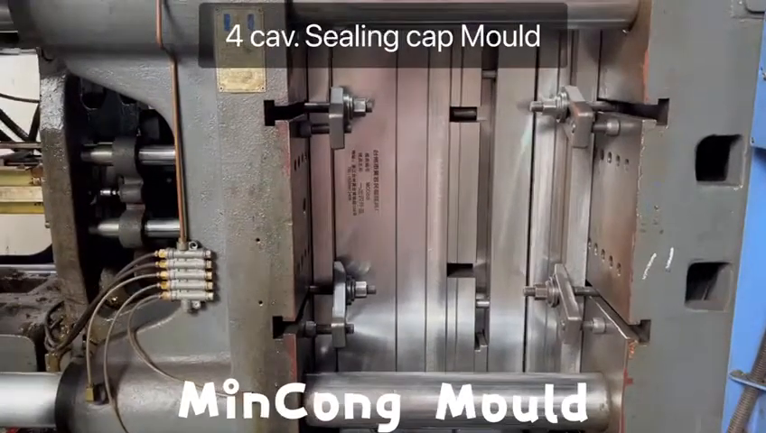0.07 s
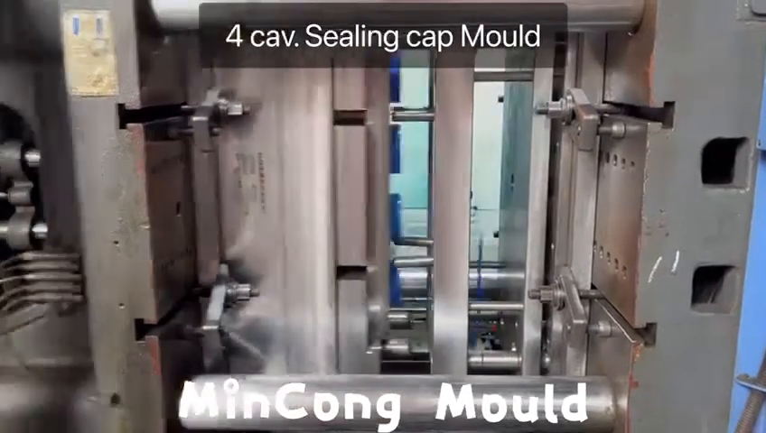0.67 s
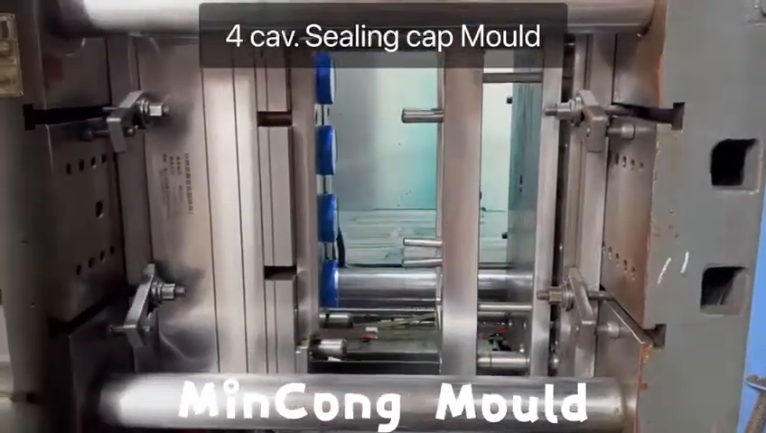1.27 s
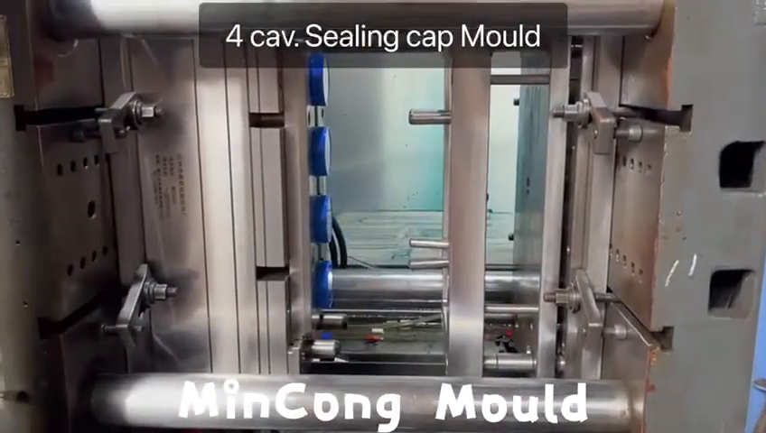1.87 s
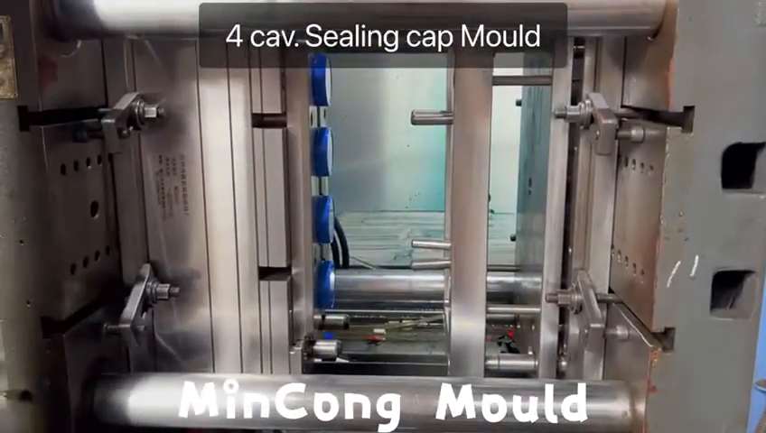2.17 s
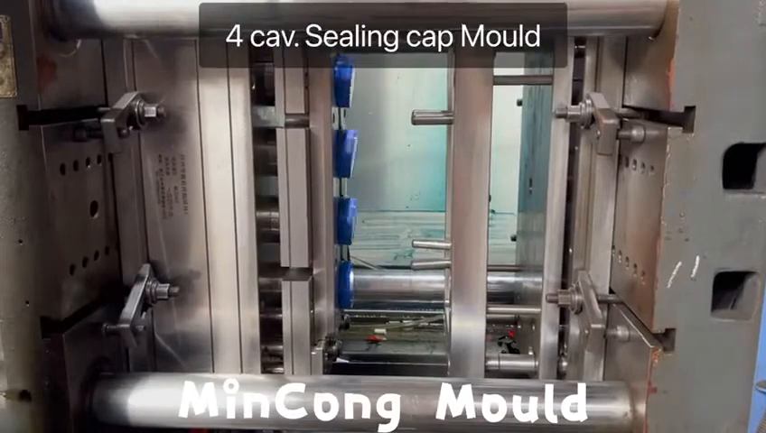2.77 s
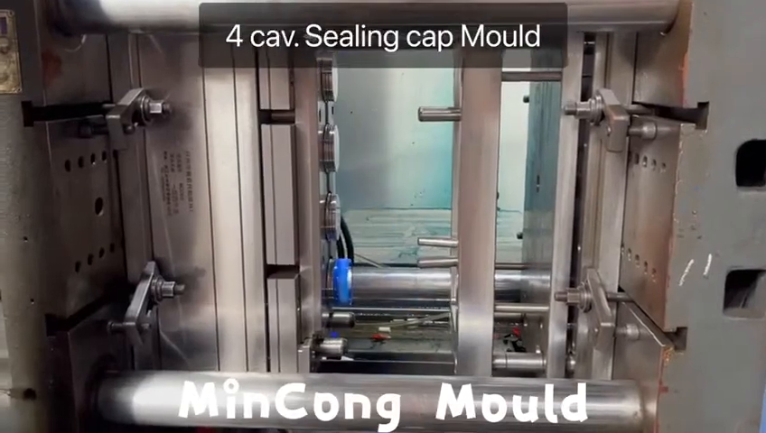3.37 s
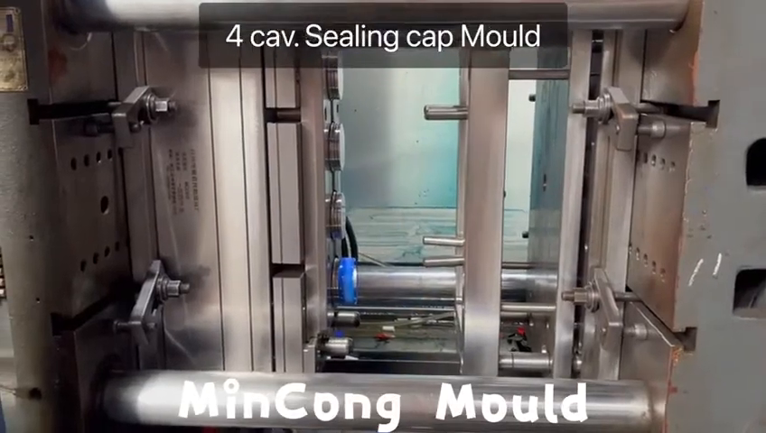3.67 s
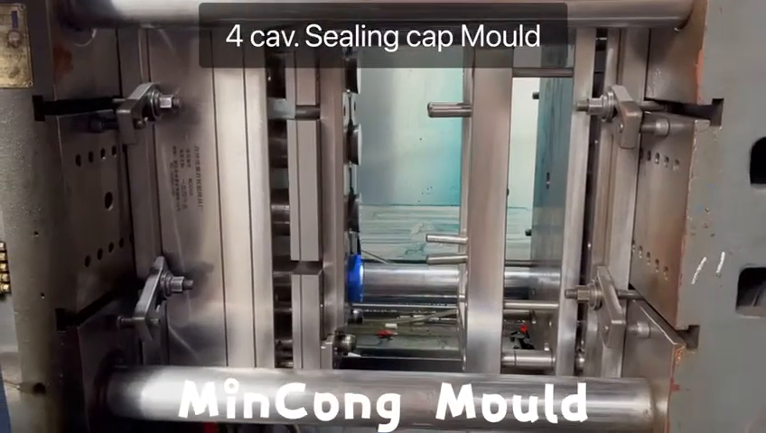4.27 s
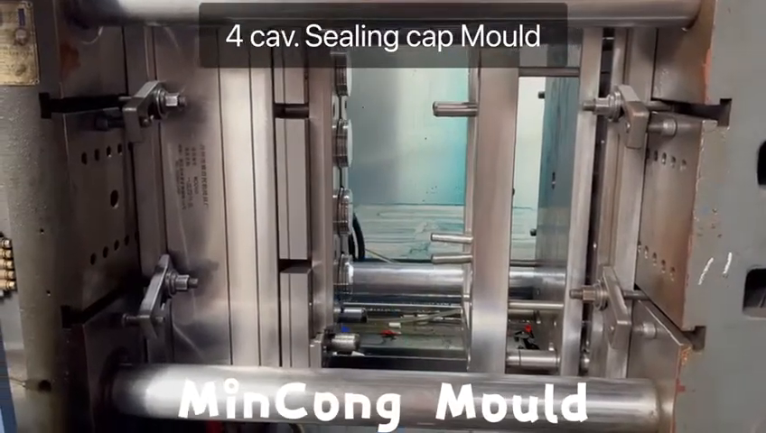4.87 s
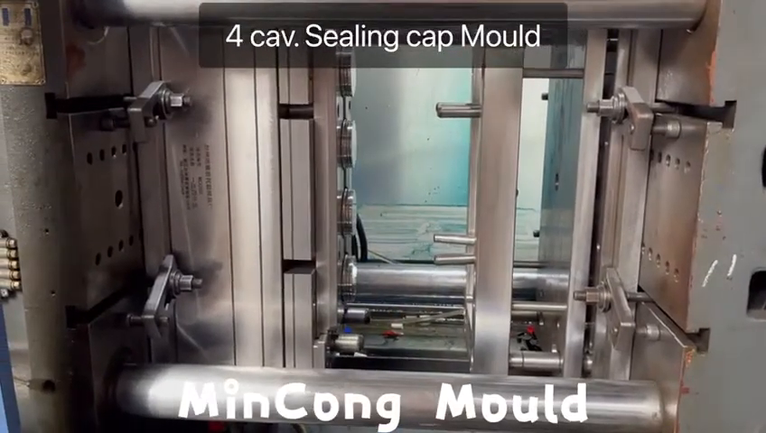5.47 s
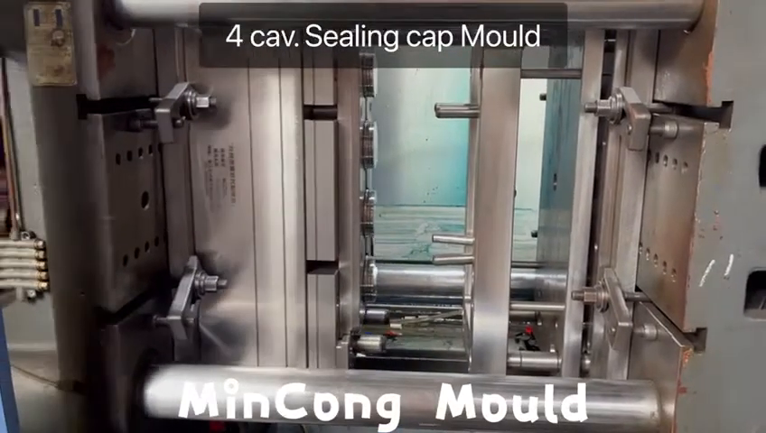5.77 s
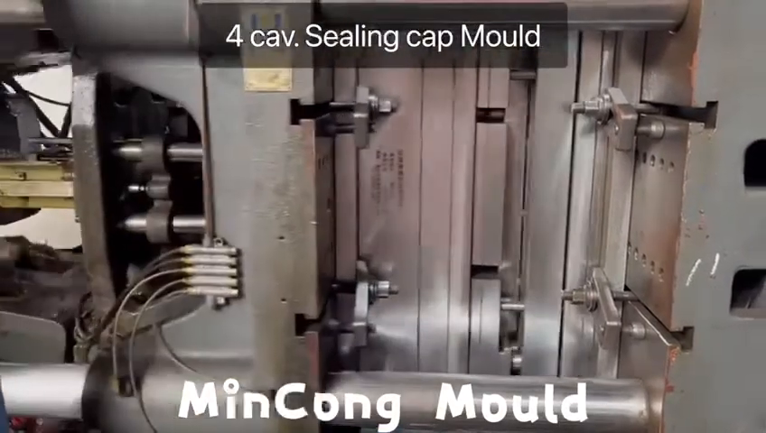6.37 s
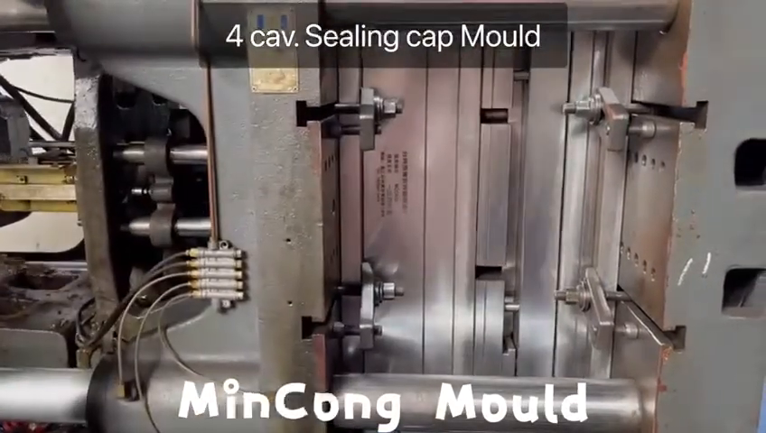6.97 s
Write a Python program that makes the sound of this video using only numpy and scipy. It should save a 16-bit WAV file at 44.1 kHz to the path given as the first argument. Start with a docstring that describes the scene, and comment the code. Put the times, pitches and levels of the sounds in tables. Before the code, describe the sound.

An injection moulding machine runs close by in a factory hall, with a steady motor drone and a faint hiss of oil. A draught puffs and rumbles unevenly on the microphone throughout. At about 0.5 seconds the steel mould cracks open with a ringing bang and a short squeak, followed by lighter knocks until just after 1 second. Around 2.5 seconds the ejector starts with a cluster of metal clacks and small squeaks. Louder clacks come at 3.1 seconds and a rattling crash at 3.5, trailing off in smaller knocks, all with a slight echo. Another sharp clack lands near 5 seconds, then a softer one. At about 6.4 seconds the mould shuts with one dead knock. The clamp then squeals in rough, high bouts that grow louder, turning shrill and hissing from about 6.9 seconds to the end, just after 7.

```python
"""An injection moulding machine runs one cycle in a droning hall, while a low rumble comes in puffs,
like a draught on the microphone. Half a second in, the steel mould cracks open with a ringing bang
and a squeak, and the heavy plate that carries it slides back. Around three seconds the ejector, which
pushes the part out, clacks in two bursts. After six seconds the mould knocks shut, and the clamp
squeals in rough bouts as pressure builds, then turns shrill and hisses."""
import sys
import numpy as np
from scipy import signal
from scipy.fft import rfft, irfft, next_fast_len
from scipy.io import wavfile
from scipy.ndimage import map_coordinates

SR = 44100
rng = np.random.default_rng(int(sys.argv[2]) if len(sys.argv) > 2 else 0)


def wav_out(sig):
    """Save sig, one row per channel (or a flat mono array), as 16-bit PCM at SR to the path in sys.argv[1]."""
    wavfile.write(sys.argv[1], SR, np.round(np.clip(np.atleast_2d(sig).T, -1, 1) * 32767).astype(np.int16))


N = 313551

# the tone colour of a struck steel plate: pitch_hz, level_db
PLATE_SPECTRUM = [(200, -41), (600, -5), (1100, 3), (2100, -1), (3200, -4), (4800, -6), (7000, -38),
                  (12000, -85)]
# left-right likeness of the noise; a narrow treble band near 8 kHz is opposite in the two ears:
# pitch_hz, likeness (1 same, -1 or less opposite)
NOISE_LIKENESS = [(60, 0.41), (250, 0.35), (600, 0.54), (1240, -0.26), (2300, 0.51), (5600, 0.2),
                  (7000, -0.39), (8300, -1.82), (9400, -0.66), (10500, 0.99)]
# the tone colour of slow swirls of air: pitch_hz, level_db
RUMBLE_SPECTRUM = [(20, -18), (35, 2.5), (52, 10.5), (80, 11.5), (120, 8.5), (200, -2.5), (500, -81)]
# the tone colour of small swirls of air: pitch_hz, level_db
FLUTTER_SPECTRUM = [(60, -31), (170, -1.5), (300, -2.5), (500, -3.5), (800, -8.5), (1200, -15.5),
                    (2000, -38.5), (4000, -79)]
# how alike the draught sounds in both ears: pitch_hz, likeness
DRAUGHT_LIKENESS = [(50, 0.98), (130, 0.71), (600, 0.69), (1500, 0.051)]


def mould_opens(start_s=.499, ring_db=1, phase_spread=0.43, rub_depth=.45, rub_rate=160):
    """The mould halves snap apart and ring, roughened by rubbing on their guide pins."""
    # the notes the mould rings with: pitch_hz, level_db, fade_s
    notes = [(350, -16.5, 0.075), (389, -8.5, 0.085), (1040, -17.5, 0.12), (1080, -12, 0.15),
             (1715, -14, 0.063), (1775, -11, 0.039), (1810, -21, 0.25), (2010, -13.5, 0.067),
             (2085, -23, 0.16), (2530, -21.5, 0.075), (3335, -26, .07), (3528, -29.5, 0.23),
             (4200, -26, 0.17), (4920, -46, 0.25), (5290, -47, 0.21)]
    out, t = np.zeros((2, N)), np.arange(SR // 2) / SR
    for hz, db, fade_s in notes:
        phase = phase_spread * rng.standard_normal((2, 1)) + rub_depth * wobble(rub_rate, size=len(t))
        ring = blow(t, fade_s, rise_s=0.00041) * np.sin(2 * np.pi * hz * t + phase)
        add(out, start_s, amp(db + ring_db) * ring)
    return out


def mould_shuts(start_s=6.392, peak_db=-1, phase_spread=0.27, rise_s=0.00053):
    """The mould faces slam together and stop each other ringing: one dead knock."""
    # the shut mould's notes (wider ones die sooner): pitch_hz, width_hz, level_db
    notes = [(292, 50, -1), (502, 36, 4), (690, 20, -1), (1240, 59, 9.5), (1830, 69, 6.5), (1955, 170, 9.5),
             (2340, 110, -6), (3420, 25, -19), (3630, 12, -20), (4240, 54, -10.5)]
    out, t = np.zeros((2, N)), np.arange(SR // 6) / SR
    knock = np.zeros((2, len(t)))
    for hz, width_hz, db in notes:
        phase = phase_spread * rng.standard_normal((2, 1))
        knock += amp(db) * np.exp(-np.pi * width_hz * t) * np.sin(2 * np.pi * hz * t + phase)
    knock *= 1 - np.exp(-t / rise_s)
    add(out, start_s, amp(peak_db) * knock / np.abs(knock).max())
    return out


def clacks(plate_db=-7.5, tick_db=-6, tick_life=0.9, chatter_db=1.5, left_db=1.6):
    """Heavy steel parts chatter as they meet: a thud that rings the frame, and a shorter bright tick."""
    # plates and pins hit and scrape: start_s, level_db, bright_db, rise_s, fade_s, ring_db
    hits = [(.072, -27.5, 3, 0.0033, 0.13, 0), (0.495, -10.5, -7, .001, 0.073, 3),
            (.695, -18, -22, .009, 0.21, 3), (0.724, -13, -6, .0006, 0.049, -5),
            (.843, -29, 1.5, .005, 0.11, 0), (0.909, -18, -14, 0.0027, 0.11, 4),
            (1.043, -18.5, -16, .002, 0.13, -2), (1.073, -25, -12, 0.0023, .1, -6),
            (1.092, -24, -9, .002, 0.088, -6), (1.123, -23, -15, .002, .08, -6),
            (2.405, -19.5, -18, 0.0064, 0.093, 2), (2.45, -30.5, 6, 0.00092, .07, 0),
            (2.463, -28.5, 8, .005, 0.27, 0), (2.498, -21, 6.5, .001, 0.083, 0),
            (2.548, -17.5, -1.5, .0023, 0.1, -5), (2.562, -10, -1.5, 0.0036, 0.12, 2),
            (2.827, -18.5, -25, 0.0012, 0.087, -3), (2.914, -19, -4.5, .0008, 0.075, -13),
            (3.113, -13.5, -22, .008, 0.17, -5), (3.14, -7.5, -17, 0.0015, 0.074, -24),
            (3.1541, -8, -7.5, 0.0009, 0.064, -21), (3.368, -28.5, 0.5, .0007, 0.044, -5),
            (3.464, -8, -5, 0.0012, 0.097, -8), (3.475, -7.5, -12, .0011, 0.082, -9),
            (3.49, -7.5, -16, .002, 0.14, -8), (3.537, -16, -9.5, .003, 0.15, -1),
            (3.599, -19, -18, 0.0022, 0.12, 2), (3.636, -25, -19, 0.0022, 0.068, -3),
            (3.703, -18, -22, .002, 0.08, -5), (3.717, -12.5, -18.5, .0015, .1, -2),
            (3.7782, -18.5, -15, 0.0017, 0.11, 4), (5.0645, -8, -6, 0.00048, 0.048, -16),
            (5.071, -8.5, -20, 0.00077, 0.052, -7), (5.092, -14, -13, 0.0046, 0.11, -2),
            (5.2609, -18, -17, 0.0036, 0.15, -2), (6.376, -21, -15, 0.001, 0.072, 9),
            (6.3909, -14, -7, .00075, 0.064, 7)]
    # the tone colour of a tick: pitch_hz, level_db
    tick_spectrum = [(1500, -35), (3500, 4), (6200, 15), (8000, 9), (10500, 8), (11700, 3), (12300, -41)]
    # the notes of the frame's plates and bars: pitch_hz, width_hz, level_db
    frame_notes = [(1065, 460, 4.5), (1880, 89, -18), (2520, 12, -8), (2590, 31, -10), (3500, 40, -18),
                   (3680, 100, -15), (6300, 90, -20)]
    out, t = np.zeros((2, N)), np.arange(SR // 5) / SR
    rattle = amp(chatter_db * wobble(450))
    plates, ticks = rush(PLATE_SPECTRUM, NOISE_LIKENESS), rush(tick_spectrum, NOISE_LIKENESS)
    for start_s, db, bright_db, rise_s, fade_s, ring_db in hits:
        chatter = rattle[round(start_s * SR):][:len(t)]
        # a light, bright contact hardly moves the plates
        weight = 1 / np.sqrt(1 + amp(bright_db - 1.5) ** 4)
        thud_noise = filtered(stretch(plates, size=len(t)), part_colour)
        tick_noise = filtered(stretch(ticks, size=len(t)), part_colour)
        thud = weight * chatter * blow(t, fade_s, rise_s) * thud_noise
        tick = chatter * blow(t, fade_s * tick_life, rise_s / 2) * tick_noise
        ring = amp(ring_db) * filtered(thud, lambda hz: resonances(frame_notes, hz))
        body = (thud + ring) * amp([[left_db], [-left_db]])
        add(out, start_s, amp(db + plate_db) * body + amp(db + bright_db + tick_db) * tick)
    return out


def ejector_crash(start_s=3.472, crash_db=-16.0, fade_s=0.15, rise_s=.003, width_hz=45):
    """The ejector plate hits its back stop and rattles there, which keeps all its notes ringing."""
    # the ejector plate's notes: pitch_hz, level_db
    plate_notes = [(1270, -1), (1345, -2), (1685, -7), (1900, -1), (2010, 0), (2140, 0), (2295, -2),
                   (2540, -2), (2815, -1)]
    notes = [(hz, width_hz, db) for hz, db in plate_notes]
    out, t = np.zeros((2, N)), np.arange(SR // 4) / SR
    ringing = filtered(rush(PLATE_SPECTRUM, NOISE_LIKENESS), lambda hz: resonances(notes, hz))
    add(out, start_s, amp(crash_db) * burst(blow(t, fade_s, rise_s), ringing))
    return out


def squeaks(jitter_rate=400):
    """Steel pins stick and slip in their sleeves: scratchy tones that swell and stop."""
    # one squeak a row: middle_s, length_s, pitch_hz, glide_hz_per_s, level_db, jitter_radians
    slips = [(0.538, 0.028, 1090, 0, -13, 0.4), (0.564, 0.014, 1076, 0, -17, 0.58),
             (0.538, 0.017, 3160, -6000, -16, 1.2), (0.536, .012, 3800, -15000, -25, 1.4),
             (0.7, 0.018, 3300, 12000, -34, 0.99), (.716, .018, 1900, -3000, -25, 0.65),
             (2.411, 0.02, 3270, 1, -34.5, 2.3), (2.478, 0.008, 6800, 0, -21, 1.3),
             (2.589, 0.04, 560, 0, -15.5, 1.17), (2.865, 0.084, 5100, 5, -48, 0.98),
             (2.9, .12, 4700, 0, -49, .8), (4.31, 0.24, 4480, 0, -47, 1.3),
             (4.776, 0.032, 3120, 4007, -30, 1.4)]
    out, t = np.zeros((2, N)), np.arange(-SR // 4, SR // 4) / SR
    waver = np.array([wobble(jitter_rate), wobble(jitter_rate)])
    for middle_s, length_s, hz, glide, db, roughness in slips:
        jitter = roughness * waver[:, round(middle_s * SR):][:, :len(t)]
        swell = np.exp(-(2 * t / length_s) ** 2)
        tone = np.sin(2 * np.pi * (hz * t + glide * t * t / 2) + jitter)
        add(out, middle_s + t[0], amp(db) * swell * tone)
    return out


def clamp_squeal(squeal_db=-1, overtone_db=-2, hiss_db=1, room_db=-13):
    """The clamp squeals in rough bouts as pressure builds, then turns shrill and hisses."""
    # the squeal's changing pitch: time_s, pitch_hz
    pitch_path = [(6.5, 2480), (6.59, 2467), (6.61, 2626), (6.7, 2590), (6.8, 2573), (6.88, 2514),
                  (6.92, 2462), (6.97, 2457), (7.0, 2424), (7.04, 2432), (7.07, 2462), (7.11, 2400)]
    # the squeal catches and surges: start_s, end_s, level_db, octave_db
    bouts = [(6.467, 6.52, -43, -65), (6.522, 6.599, -32, -50), (6.606, 6.682, -34, -58),
             (6.683, 6.712, -19, -54), (6.706, 6.76, -40, -44), (6.76, 6.805, -28.5, -51),
             (6.823, 6.864, -26, -48), (6.87, 6.91, -28, -42), (6.907, 6.937, -17, -33),
             (6.94, 6.977, -22.5, -33), (6.985, 7.016, -14, -29.5), (7.023, 7.03, -10.5, -42),
             (7.034, 7.062, -24, -33), (7.066, 7.08, -16.5, -42), (7.083, 7.12, -31.5, -38)]
    # the shrill tones above the squeal: pitch_multiple, level_db
    overtones = [(3, -4.5), (4, -6), (5, -23)]
    # the tone colour of the hiss at full pressure: pitch_hz, level_db
    hiss_spectrum = [(2000, -24), (3500, 2.5), (6300, 1.5), (8200, 6), (10300, -6), (11600, -2),
                     (12200, -22)]
    stutter, stutter_rate, waver_hz = .3, 150, 13
    split_s, split_hz, split_db = 6.82, 85, -14
    full_pressure_s, rise_s, shrill_db = 6.875, 0.012, -40
    t = np.arange(N) / SR
    pitch, = curves(pitch_path)
    phase = 2 * np.pi * np.cumsum(pitch + waver_hz * wobble(220)) / SR
    # near full pressure a second tone splits off just above the first and beats against it
    split = amp(split_db) * (1 + np.tanh((t - split_s) / rise_s)) / 2
    beat = 2 * np.pi * np.cumsum(split_hz * (1 + stutter * wobble(40))) / SR

    def tone(multiple):
        """One tone of the squeal: its strength shakes, and it flutters between the ears."""
        strength = 1 + stutter * wobble(stutter_rate)
        sway = stutter * wobble(multiple * stutter_rate) * np.array([[1], [-1]])
        angle = multiple * phase
        return strength * np.cos(angle) + sway * np.sin(angle) + split * np.cos(angle + beat)

    sounding = np.array([gate(t, start, end, edge_s=0.0049) for start, end, _, _ in bouts])
    base_gain, octave_gain = amp(np.transpose(bouts)[2:] + squeal_db) @ sounding
    squeal = base_gain * tone(multiple=1) + octave_gain * tone(multiple=2)
    shrill = amp(shrill_db) * (1 + np.tanh((t - full_pressure_s) / rise_s)) / 2
    squeal += shrill * amp(overtone_db) * sum(amp(db) * tone(round(k)) for k, db in overtones)
    hiss = shrill * amp(hiss_db + 1.5 * wobble(110)) * rush(hiss_spectrum, NOISE_LIKENESS)
    return squeal + amp(room_db) * room(squeal) + hiss


def puffs(push_db=-2.5, wake_db=-6, build_s=0.0015, wake_s=0.014, rumble_s=0.019, uneven_db=0.5):
    """A strong swirl of air gives one push and pull, inside a brief swell of flutter and rumble."""
    # the draught's strongest puffs: time_s, level_db, rumble_db
    swirls = [(0.026, -5, -14), (0.059, -18.5, -22.5), (0.079, -7, -29), (0.098, -7, -19),
              (0.126, -18, -19), (0.201, -12.5, -19), (0.276, -14, -22), (0.451, -8, -33),
              (0.818, -12, -25), (0.847, -13.5, -21), (0.924, -16.5, -21), (0.946, -9, -29),
              (0.982, -13, -24), (1.245, -13, -26), (1.267, -9, -20), (1.33, -9, -19), (1.376, -13, -27),
              (1.399, -15, -26), (1.56, -22.5, -32), (1.668, -20.5, -35), (1.738, -17, -36),
              (1.833, -15.5, -23), (1.856, -13.5, -27), (1.899, -12, -33), (2.056, -14, -30),
              (2.112, -14.5, -33), (2.586, -12, -25), (2.645, -14.5, -26), (2.687, -17, -27),
              (2.91, -14, -21.5), (3.062, -24, -20.5), (3.108, -11.5, -21.5), (3.132, -13.5, -30),
              (3.267, -16, -29), (3.33, -14.5, -24), (3.398, -16, -21), (3.57, -12, -19),
              (3.623, -18.5, -22), (3.741, -16.5, -27), (3.866, -13.5, -31), (3.892, -17, -24),
              (3.934, -15, -32), (4.065, -14.5, -31), (4.319, -11.5, -23), (4.487, -11.5, -25),
              (4.559, -10, -22.5), (4.678, -11.5, -24.5), (4.91, -15.5, -23), (5.006, -16.5, -22),
              (5.039, -12.5, -24), (5.064, -12.5, -24), (5.211, -11, -25), (5.42, -18.5, -25),
              (5.494, -12, -24), (5.551, -8.5, -23), (5.677, -16, -16.5), (6.041, -17, -25),
              (6.109, -14, -36), (6.133, -12, -24), (6.195, -11, -21), (6.589, -15, -20),
              (6.622, -14, -19.5), (6.685, -14, -33), (6.785, -9, -21), (6.86, -10, -22),
              (6.991, -11.5, -23), (7.036, -13, -39)]
    typical_hz, size_scatter, ear_delay_s = 397, .25, .0002
    out, t = np.zeros((2, N)), np.arange(-SR // 16, SR // 6) / SR
    age = t + 0.0033  # the air churns just before the push
    churn = np.exp(np.minimum(age / build_s, -age / wake_s))
    swell = np.exp(-(t / rumble_s - .5) ** 2)
    flutter, low = rush(FLUTTER_SPECTRUM, DRAUGHT_LIKENESS), rush(RUMBLE_SPECTRUM, DRAUGHT_LIKENESS)
    for time_s, db, rumble_db in swirls:
        late, strength = rng.standard_normal((2, 2, 1))  # it meets left and right unevenly
        swing = 2 * np.pi * typical_hz * rng.lognormal(0, size_scatter) * (t - ear_delay_s * late)
        push = rng.choice([-1, 1]) * amp(uneven_db * strength) * swing * np.exp((1 - swing ** 2) / 2)
        wake = amp(db + wake_db) * burst(churn, flutter)
        rumble = amp(rumble_db) * burst(swell, low)
        add(out, time_s + t[0], amp(db + push_db) * push + wake + rumble)
    return out


def draught(rumble_db=-2, flutter_db=-8, surge_db=2.5, lumpy_db=2, crackle_db=4.0, sides_db=4.0):
    """Swirls of air push on the microphone: slow ones rumble, small ones flutter in short lumps."""
    # the draught swells and lulls: time_s, rumble_db, flutter_db
    swells = [(0.0, -18.5, -12.5), (0.2, -20, -20.5), (0.485, -24.5, -21), (0.52, -46, -39),
              (0.62, -39, -36), (0.94, -20, -14.5), (1.04, -27, -36), (1.32, -30, -21.5), (1.6, -26, -44),
              (1.88, -25, -24), (2.0, -55, -64), (2.12, -25, -21), (2.87, -27, -26), (3.55, -26.5, -25),
              (4.15, -27.5, -28.5), (4.85, -28, -32), (5.03, -24, -28), (5.62, -22, -22), (5.85, -24, -26),
              (6.9, -22, -21.5)]
    rumble_level, flutter_level = curves(swells)
    swirls = wobble(35)
    rumble = unit(amp(surge_db * swirls) * rush(RUMBLE_SPECTRUM, DRAUGHT_LIKENESS))
    lumps_db = lumpy_db * swirls + crackle_db * wobble(260)
    each_ear_db = sides_db * np.array([wobble(110), wobble(110)])
    flutter = unit(amp(lumps_db + each_ear_db) * rush(FLUTTER_SPECTRUM, DRAUGHT_LIKENESS))
    return amp(rumble_level + rumble_db) * rumble + amp(flutter_level + flutter_db) * flutter


def factory(drone_db=-30.0, hiss_db=-50.5, throb_db=3.0, throb_below_hz=600, hiss_waver_db=.6):
    """Motors hum and drone, and oil hisses; the drone and hiss grow while oil moves the machine."""
    # unlock, open, eject, pull back, close, clamp: start_s, end_s, drone_rise_db, hiss_rise_db
    strokes = [(-.1, 0.227, 0.5, 4), (0.744, 1.166, 3, 5), (2.45, 3.31, 0, 3.5), (3.54, 3.797, 3.5, 6),
               (5.04, 6.355, 1.3, 1.5), (6.33, 7.2, 2.5, 4)]
    # the motors' tones: pitch_hz, level_db
    motor_tones = [(64.6, -42.5), (100, -44.5), (1200, -52)]
    # the tone colour of the hall's drone: pitch_hz, level_db
    drone_spectrum = [(20, -36), (55, -0.5), (200, -1), (320, -3), (700, -8), (1000, -8.5), (1220, -9),
                      (1550, -13), (2100, -20.5), (3200, -26.5), (5000, -38), (12000, -58)]
    # the tone colour of flowing oil: pitch_hz, level_db
    oil_spectrum = [(800, -26), (2500, 5), (4500, 5.5), (6800, -2), (8200, -4.5), (9800, -6.5),
                    (11500, -10.5), (12300, -50)]
    t = np.arange(N) / SR
    flow = np.array([gate(t, start, end, edge_s=0.12) for start, end, _, _ in strokes])
    drone_rise, hiss_rise = np.transpose(strokes)[2:] @ flow
    hum = np.zeros(N)
    for hz, db in motor_tones:
        strength = amp(db + 1.8 * wobble(4.9)) * np.sqrt(2)
        hum += strength * np.sin(2 * np.pi * hz * t + 0.67 * wobble(16))
    drone = rush(drone_spectrum, NOISE_LIKENESS)
    low = filtered(drone, lambda hz: 1 / (1 + (hz / throb_below_hz) ** 4))
    throbbing = drone - low + low * amp(throb_db * wobble(26))
    hiss = amp(hiss_db + hiss_rise + hiss_waver_db * wobble(58)) * rush(oil_spectrum, NOISE_LIKENESS)
    return amp(drone_db + drone_rise) * throbbing + hiss + hum


def room(x):
    """The hall's echo, different at each ear and shorter in the treble."""
    # how long the echo lasts: pitch_hz, fade_s
    echo_times = [(200, 0.54), (2000, 0.52), (6000, 0.24), (12000, 0.021)]
    hz, t, noise = signal.stft(rng.standard_normal((2, SR // 2)), SR, nperseg=256)
    fade = np.exp(-np.log(1000) * t / along(echo_times, hz)[:, None])
    tail = signal.istft(noise * fade, SR, nperseg=256)[1]
    return signal.fftconvolve(x, tail / np.linalg.norm(tail[0]), axes=1)[:, :N]


def resonances(notes, hz):
    """How steel answers each pitch, given its notes: pitch_hz, width_hz, level_db."""
    return sum((-1) ** k * amp(db) * 1j * hz * width / (pitch ** 2 - hz ** 2 + 1j * hz * width)
               for k, (pitch, width, db) in enumerate(notes))


def part_colour(hz, depth_db=2.8, spacing_hz=110):
    """Each struck part favours its own random set of pitches."""
    bumps = rng.standard_normal(SR // spacing_hz)
    return unit(amp(depth_db * map_coordinates(bumps, [hz / spacing_hz])))


def rush(spectrum, likeness):
    """Stereo noise with a given tone colour and left-right likeness, at strength 1."""
    def response(hz):
        """Share each pitch between what the ears have in common (mid) and what differs (side)."""
        turn = np.arccos(np.clip(along(likeness, hz), -1, 1)) / 2
        return amp(along(spectrum, hz)) * [np.cos(turn), np.sin(turn)]

    mid, side = filtered(rng.standard_normal((2, N)), response)
    return unit(np.array([mid + side, mid - side]))


def stretch(noise, size):
    """A random piece of a long noise."""
    start = rng.integers(noise.shape[-1] - size)
    return noise[:, start:start + size]


def burst(envelope, noise):
    """A random piece of noise shaped by a loudness curve, with that curve's energy."""
    sound = envelope * stretch(noise, size=len(envelope))
    return unit(sound) * np.sqrt(np.mean(envelope ** 2))


def blow(t, fade_s, rise_s):
    """A quick rise, then a fall of 60 dB in fade_s."""
    return (1 - np.exp(-t / rise_s)) * np.exp(-np.log(1000) * t / max(fade_s, .005))


def gate(t, start, end, edge_s):
    """1 between start and end, with soft edges."""
    return (np.tanh((t - start) / edge_s) - np.tanh((t - end) / edge_s)) / 2


def wobble(rate, size=N):
    """A smooth curve through `rate` random values a second."""
    values = rng.standard_normal(int(size * rate / SR) + 4)
    return map_coordinates(values, [np.arange(size) * rate / SR])


def filtered(x, response):
    """Change the tone colour of x: multiply each pitch by response(hz)."""
    size = x.shape[-1]
    padded = next_fast_len(size + 8192)
    return irfft(rfft(x, padded) * response(np.fft.rfftfreq(padded, 1 / SR)), padded)[..., :size]


def along(points, hz):
    """Read between rows of pitch_hz, value, with octaves evenly spaced."""
    pitches, values = np.transpose(points)
    return np.interp(np.log(hz + 1), np.log(pitches + 1), values)


def curves(rows):
    """One value per sample for each column after the time."""
    times, *columns = np.transpose(rows)
    return [np.interp(np.arange(N) / SR, times, column) for column in columns]


def add(track, start_s, sound):
    """Mix a sound into a stereo track at start_s, which may be below zero."""
    start = round(start_s * SR)
    part = sound[..., max(-start, 0):N - start]
    track[:, max(start, 0):][:, :part.shape[-1]] += part


def amp(db):
    """Turn decibels into a multiplier."""
    return 10 ** (np.asarray(db) / 20)


def unit(x):
    """Scale x to an average strength (rms) of 1."""
    return x / np.sqrt(np.mean(x ** 2) + 1e-20)


def scene(clack_room_db=-11, mould_room_db=-15):
    """The machine close by, in its hall."""
    # the background dips briefly after the bang: time_s, level_db
    background_levels = [(.5, 5), (.55, 1.5), (.62, -2), (.75, 2)]
    background_db, = curves(background_levels)
    knocks = clacks() + ejector_crash()
    mould = mould_opens() + squeaks() + mould_shuts()
    echo = room(amp(clack_room_db) * knocks + amp(mould_room_db) * mould)
    return amp(background_db) * factory() + draught() + puffs() + knocks + mould + echo + clamp_squeal()


def record(dry, ceiling=.95, top_hz=12200):
    """Round off the loudest peaks and cut the highest treble."""
    rounded = dry / (1 + np.abs(dry / ceiling) ** 8) ** (1 / 8)
    return filtered(rounded, lambda hz: hz < top_hz)


dry = scene()
out = record(dry)
wav_out(out)
```